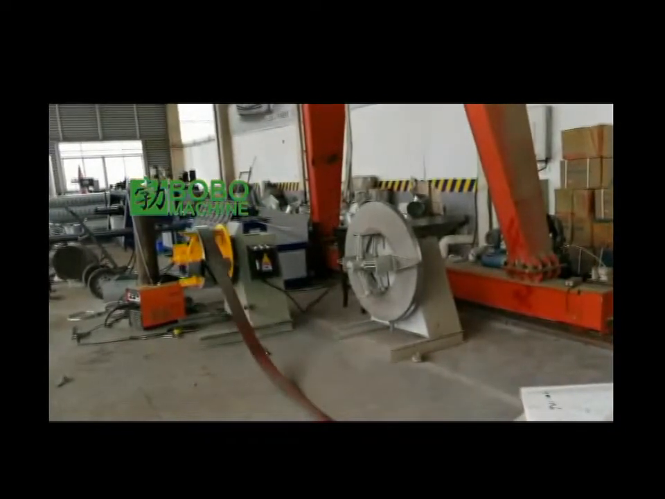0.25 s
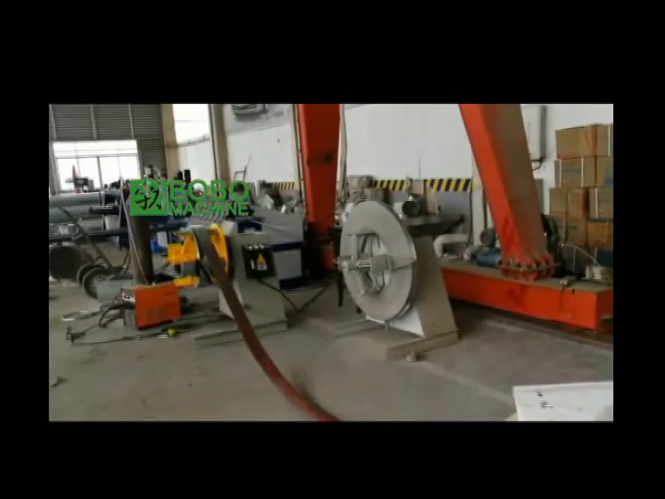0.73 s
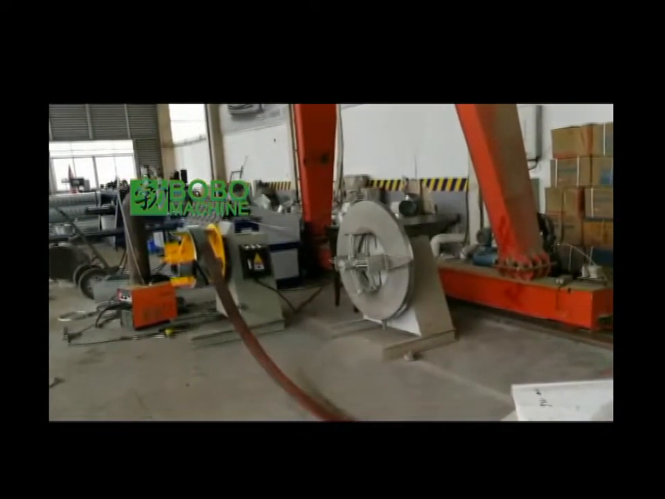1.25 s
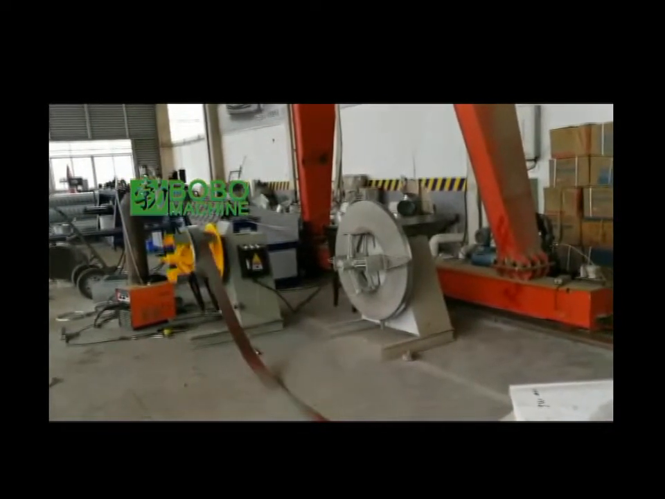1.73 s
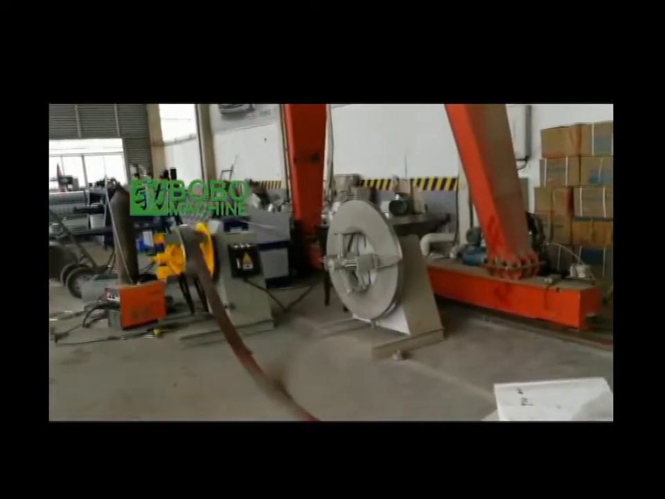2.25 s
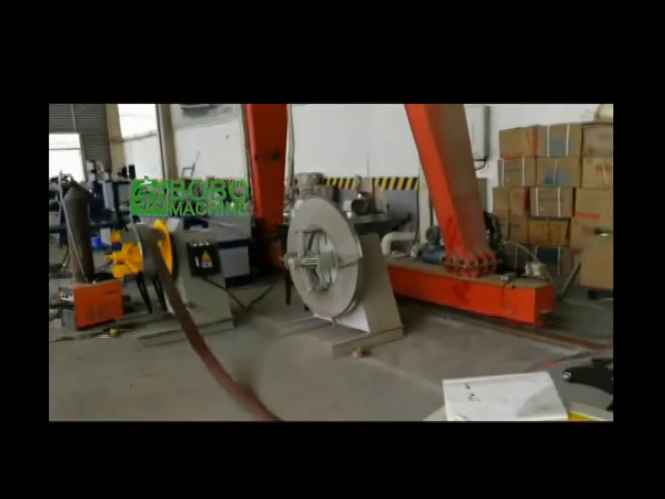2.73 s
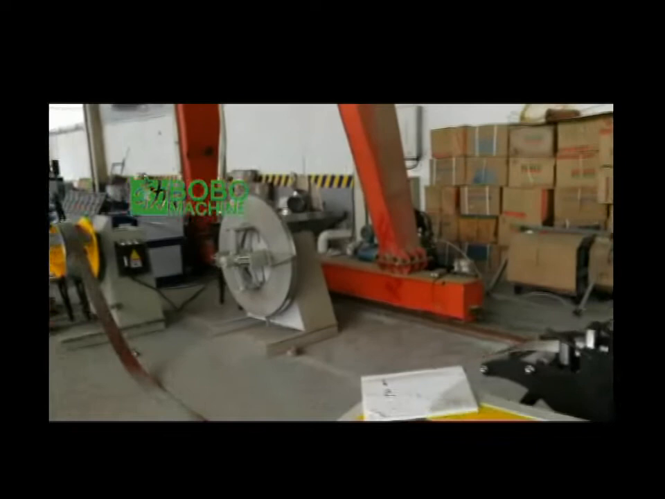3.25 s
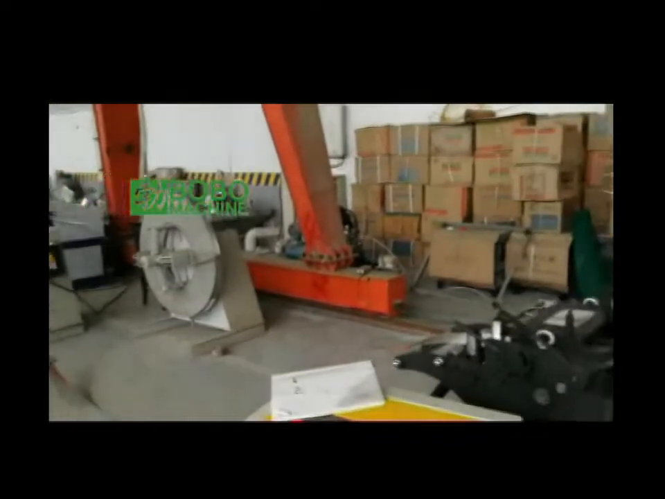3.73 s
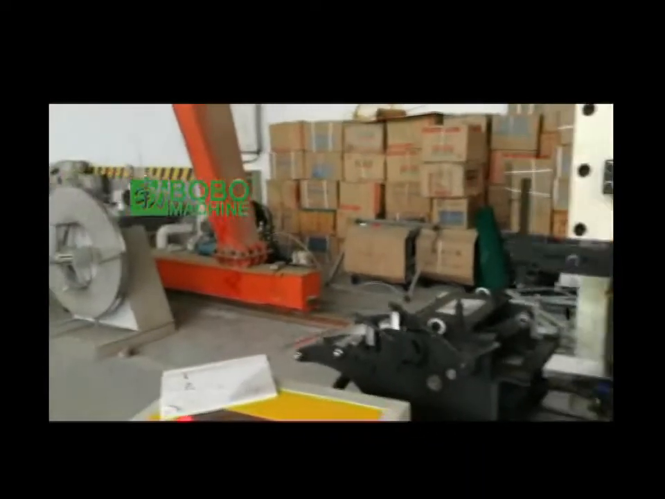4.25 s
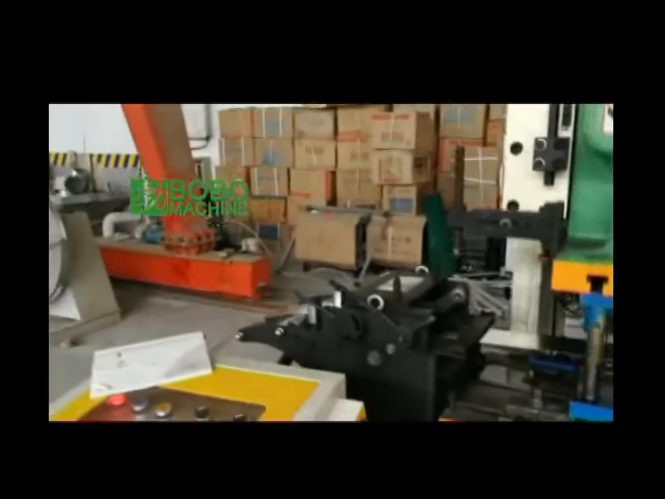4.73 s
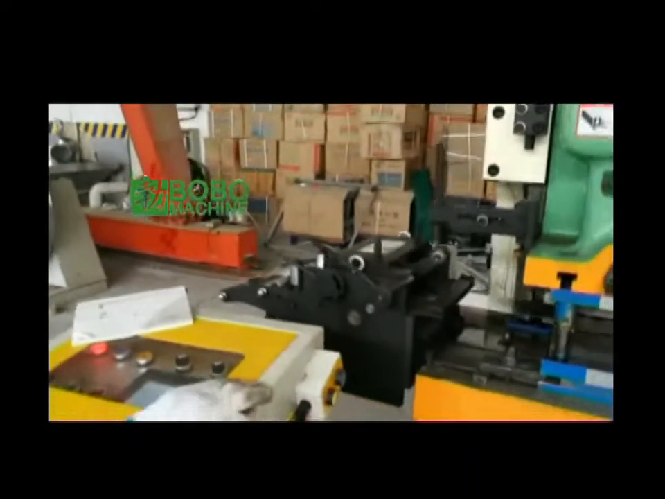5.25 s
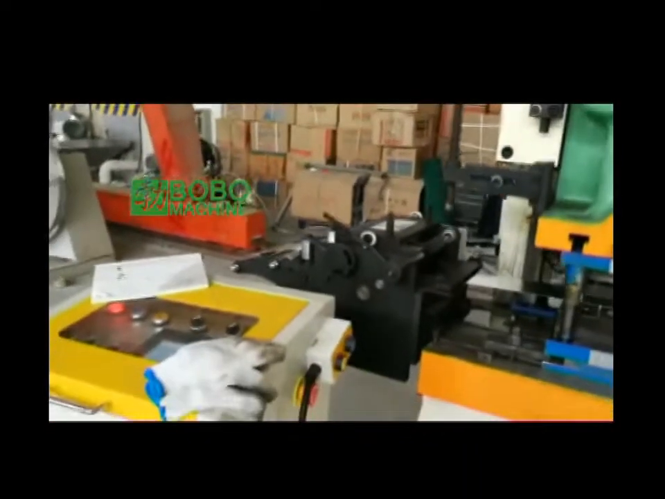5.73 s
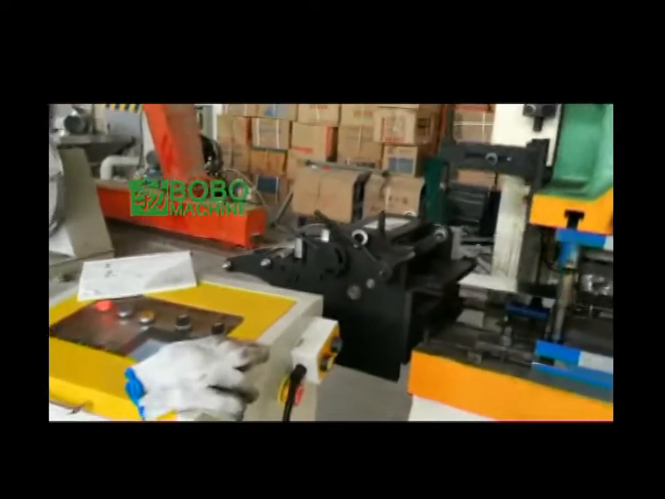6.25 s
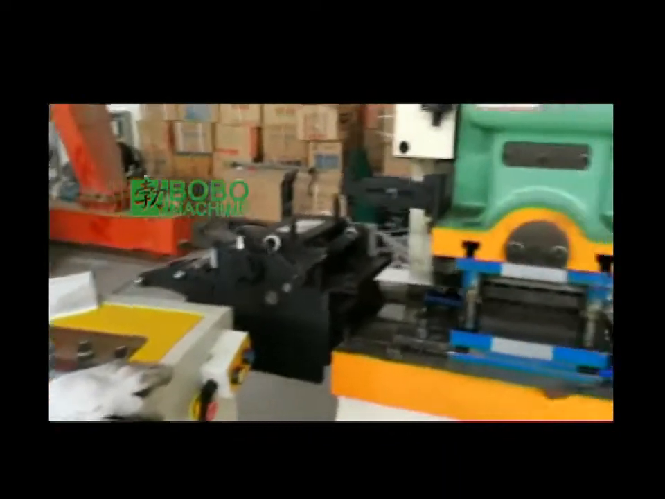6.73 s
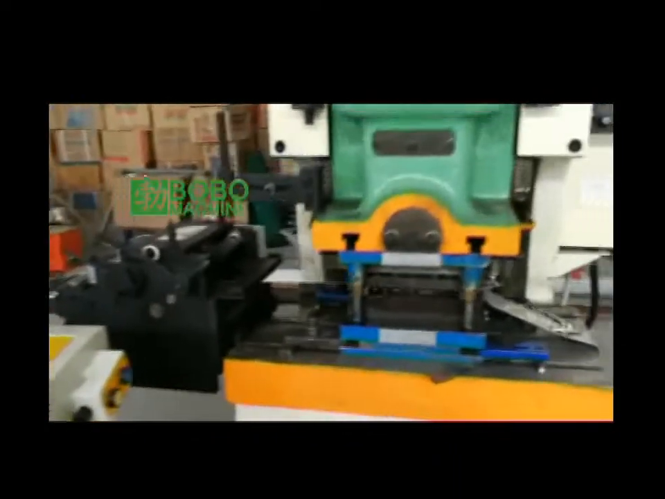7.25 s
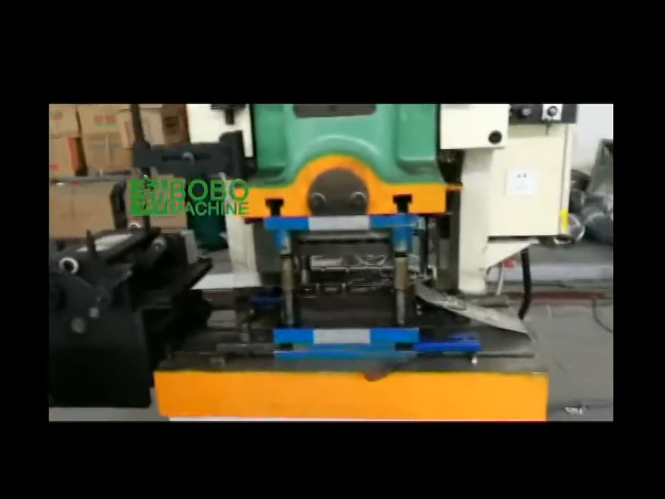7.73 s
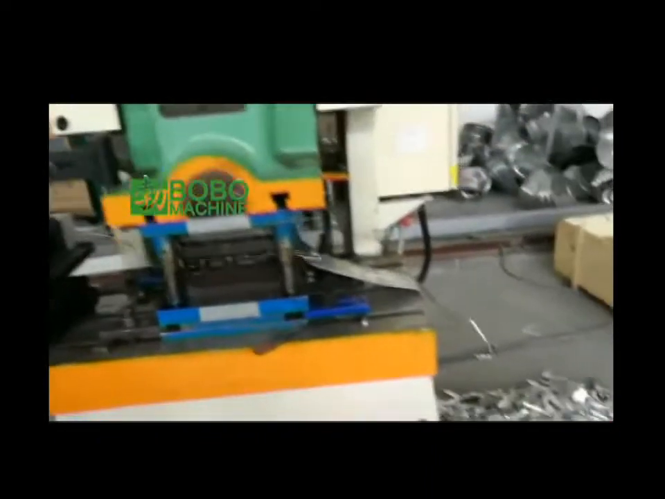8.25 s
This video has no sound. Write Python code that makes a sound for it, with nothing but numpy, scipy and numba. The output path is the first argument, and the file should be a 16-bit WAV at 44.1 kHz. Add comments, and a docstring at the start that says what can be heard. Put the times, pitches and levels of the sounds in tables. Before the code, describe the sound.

A punch press stamps steel about 83 times a minute, heavy thuds, clangs and strip rattle, stamped parts jingling in a hard workshop.

```python
"""Heavy blows thud and clang 83 times a minute: a punch press stamps steel strip in a hard-walled workshop.
Each turn of the crank: the feeder clacks, the punch thuds through the frame, the die clangs, the strip shakes
free and a stamped part drops jingling on the heap. Showers of clicks excite coloured noise bands and ringing modes;
motors and gears are shaped noise. A two-port microphone turns towards the press; its gain control ducks
under the blows, and the sound cuts out every 0.6 s."""
import sys
import numpy as np
from scipy import signal
from scipy.fft import rfft, irfft, next_fast_len
from scipy.io import wavfile
from scipy.ndimage import uniform_filter1d, map_coordinates
from numba import njit

SR = 44100
rng = np.random.default_rng(int(sys.argv[2]) if len(sys.argv) > 2 else 0)


def generate_wav(sig):
    """Save sig (samples, or channels by samples) to the path in sys.argv[1] as 16-bit PCM at SR."""
    pcm = np.round(np.clip(np.atleast_2d(sig).T, -1, 1) * 32767).astype(np.int16)
    wavfile.write(sys.argv[1], SR, pcm)


N = 373968

# Clear modes of a stamped part. Each row: pitch in Hz, level in dB, t60 in seconds.
PART_MODES = [(3354, -9, .4), (4765, -2, .45), (5588, 1, .5), (6234, -4, .3), (7172, 1, .5), (7500, -1, .3),
              (8180, 0, .5), (8721, 0, .5), (8985, -3, .4), (9755, -6, .35), (11710, -7, .2)]
# Dense, quickly damped resonances of a part. Each row: frequency in Hz, spectrum level in dB per Hz.
PART_COLOUR = [(500, -43), (2000, -9), (3500, 2.5), (5500, 6.5), (7600, 10), (8900, 11.5), (10000, 3.5),
               (11700, 6), (13000, -2), (16000, -7.5)]
# Dense resonances of the strip. Each row: frequency in Hz, spectrum level in dB per Hz.
STRIP_COLOUR = [(200, -4.5), (550, 10), (1050, 2), (1400, 9.5), (1950, 15.5), (2700, 5.5), (3500, 11.5),
                (5500, 10), (7500, 16), (9000, 11.5), (11000, 7.5), (16000, -4.5)]
FORCE_DB = -1  # force of the punch


def undb(db):
    """Decibels to gain."""
    return 10 ** (np.asarray(db) / 20)


def unit(x):
    """Scale to unit energy, averaged over the channels."""
    return x / np.sqrt(np.mean(np.sum(x ** 2, axis=-1)))


def gains(points, size):
    """A (Hz, dB) outline as gains on the bins of a transform."""
    hz, db = np.transpose(points)
    bins = np.log(np.fft.rfftfreq(size, 1 / SR) + 1)
    return undb(np.interp(bins, np.log(hz), db))


def colour(x, points):
    """Shape a sound by a spectrum, keeping the power of white noise."""
    size = next_fast_len(x.shape[-1] + 4096)
    g = gains(points, size)
    g = g / np.sqrt(np.mean(g ** 2))
    return irfft(rfft(x, size) * g, size)[..., :x.shape[-1]]


def fade(t, t60):
    """Exponential decay by 60 dB in t60 seconds."""
    return np.exp(-np.log(1000) * t / t60)


def ping(hz, t60):
    """One decaying mode."""
    t = np.arange(SR // 10) / SR
    return fade(t, t60) * np.sin(2 * np.pi * hz * t)


def add(track, s, sound):
    """Mix a sound into a track at a time in seconds."""
    i = int(s * SR)
    a, b = max(i, 0), min(i + len(sound), N)
    if b > a:
        track[a:b] += sound[a - i:b - i]


def wander(per_s):
    """Smooth random drift through a new level per_s times a second, of spread about 1.35."""
    step = int(SR / per_s)
    levels = np.repeat(rng.standard_normal(N // step + 1), step)
    return 1.65 * uniform_filter1d(levels, step)[:N]


def waver(x, depth_s=.00003, per_s=120):
    """Loose steel touches and lets go as it rings; a drifting delay roughens its high modes."""
    # depth_s is the delay per unit of drift
    return map_coordinates(x, [np.arange(N) + depth_s * SR * wander(per_s)], order=3)


def diffuse(size):
    """Noise from all round: long waves reach both ports alike, short ones unrelated."""
    mid, side = rfft(rng.standard_normal((2, size)))
    apart = np.clip(np.fft.rfftfreq(size, 1 / SR) / 620, 0, 1)
    ports = mid + np.array([[1], [-1]]) * apart * side
    return irfft(ports / np.sqrt(1 + apart ** 2), size)


def rattle(seconds, rate=2200, swell=0.38, scatter_db=4, size=12000):
    """Steel chattering on steel: a first contact, then a shower of uneven clicks that swells and dies."""
    # rate in clicks per second; swell in rattle times; the energy falls e-fold in one rattle time
    chance, lot, sign = rng.random((3, size))
    age = np.arange(size) / SR / max(seconds, 1e-4)
    strength = undb(-scatter_db * np.log(np.maximum(lot, .03)))
    clicks = (chance < rate / SR) * np.sign(sign - .5) * strength
    clicks = clicks * np.exp(-age / 2) * (1 - np.exp(-age / swell))
    clicks[0] = 1
    return unit(clicks)


def ring(modes, detune=0, mix_db=0, size=20000):
    """A body's free ringing: a sum of decaying modes at random weights, neighbours starting opposed."""
    hz, db, t60 = np.transpose(modes)[:, :, None]
    t = np.arange(size) / SR
    off, stronger = rng.standard_normal((2, *hz.shape))
    sign = (-1) ** np.arange(len(hz))[:, None]
    level = sign * undb(db + mix_db * stronger) / np.sqrt(t60)  # dB sets the energy, not the onset
    tones = np.sin(2 * np.pi * hz * (1 + detune * off) * t)
    return unit(np.sum(level * fade(t, t60) * tones, axis=0))


def body(clicks, points, modes, ring_db):
    """Clicks sound a body's dense resonances at once and leave its clear modes ringing."""
    ringing = signal.oaconvolve(clicks, ring(modes))[:N]
    return colour(clicks, points) + undb(ring_db) * waver(ringing)


def port_lag_ms(s):
    """The turning microphone: how late the left port hears the press at a time."""
    # Each row: time in seconds, lag of the left port in ms.
    bearing = [(0, 0.347), (3.2, 0.35), (4, 0.21), (6.2, 0.27), (7.1, 0.048), (8.5, -0.05)]
    return np.interp(s, *np.transpose(bearing))


def workshop(x, near_db, hall_db, size=48000):
    """Direct sound, scatter from floor and machines, then the long tail of the hall."""
    near_t60_s, hall_t60_s, treble_t60_s = 0.044, 0.98, 0.41
    t, now = np.arange(size) / SR, np.arange(N)
    lag = port_lag_ms(now / SR) * SR / 1000
    direct = np.array([map_coordinates(x, [now - lag], order=3), x])
    near = unit(diffuse(size) * fade(t, near_t60_s) * (t > .001))
    air = diffuse(size)
    low = signal.sosfilt(signal.butter(2, 4000, fs=SR, output="sos"), air)
    high = signal.sosfilt(signal.butter(2, 4000, "high", fs=SR, output="sos"), air)
    # the sign lets the two bands meet without a notch at the crossover
    tail = low * fade(t, hall_t60_s) - high * fade(t, treble_t60_s)
    tail = unit(tail * (1 - np.exp(-t / 0.0053)))
    room = undb(near_db) * near + undb(hall_db) * tail
    echoes = signal.oaconvolve(x[None], room, axes=1)[:, :N]
    return (direct + echoes) / np.sqrt(1 + undb(near_db) ** 2 + undb(hall_db) ** 2)


def strokes():
    """The moments at which the punch meets the strip: once on every turn of the flywheel."""
    first_s, turn_s, count = .0151, .72567, 12
    return first_s + turn_s * np.arange(count)


def crank(blows, level_db, slack_s, uneven_db, rate, swell):
    """The crank repeats the same blows on every turn, give or take the play in its joints."""
    track = np.zeros(N)
    for s in strokes():
        for after, seconds, db in blows:
            late, harder = rng.standard_normal(2)
            gain = undb(level_db + db + uneven_db * harder)
            add(track, s + after + slack_s * late, gain * rattle(seconds, rate, swell))
    return track


def shop(level_db=-36.5, flutter_db=2):
    """Motor, flywheel and gears rumble on between the blows as shaped noise, never quite even."""
    # Each row: frequency in Hz, spectrum level in dB per Hz.
    shop_colour = [(40, -6), (100, -5), (210, 3.5), (420, -1), (1100, -0.5), (2100, 1), (3500, -0.5),
                   (8000, -1), (11000, -4), (16000, -22)]
    rumble = colour(diffuse(next_fast_len(N))[:, :N], shop_colour)
    return undb(level_db + flutter_db * wander(50)) * rumble  # flutter in dB per unit of drift


def settle(per_s=14, clink_db=-9, uneven_db=3):
    """Loose parts on the shaking heap clink faintly at random."""
    chance, size = rng.random(N), rng.standard_normal(N)
    clinks = (chance < per_s / SR) * undb(clink_db + uneven_db * size)
    return body(clinks, PART_COLOUR, PART_MODES, ring_db=2)


def squeals(t60=0.09):
    """The sliding strip rubs on its guides: noise makes one mode or another sing out."""
    # Each row: start in seconds, length in seconds, pitch in Hz, level in dB.
    squeal_list = [(0.885, 0.046, 2210, -35), (1.574, 0.34, 1930, -37), (2.98, .13, 2190, -26),
                   (4.66, 0.028, 2166, -27), (5.23, 0.076, 2220, -29), (6.712, 0.19, 1090, -35),
                   (7.418, .18, 2230, -34)]
    track = np.zeros(N)
    for s, seconds, hz, db in squeal_list:
        size = int(seconds * SR)
        rub = rng.standard_normal(SR)[:size] * np.hanning(size) ** .5
        song = unit(signal.fftconvolve(rub, ping(hz, t60)))
        add(track, s, undb(db) * np.sqrt(size) * song)  # longer squeals carry more energy
    return workshop(track, near_db=2, hall_db=-8.5)


def bumps():
    """Dull low bumps that come with some landings, the same at both ports: clicks shaped to the bass."""
    # Each row: start in seconds, level in dB.
    bump_list = [(1.829, -7), (2.617, 2.5), (2.6245, 0), (5.42, -10), (7.64, -8), (8.336, -4)]
    # Each row: frequency in Hz, spectrum level in dB per Hz.
    bump_colour = [(70, 8), (200, 1), (500, -9), (2000, -58)]
    track = np.zeros(N)
    for s, db in bump_list:
        add(track, s, undb([db]))
    return colour(track, bump_colour)


def heap(gain_db=28, ring_db=-4, contact_db=16, detune=0.00206, count=2):
    """A stamped part ticks on the heap and bounces; each knock stirs the parts' modes in a new mixture."""
    # Parts landing after the strokes. Each row: start in seconds, level in dB, rattle time in seconds.
    landings = [(0.347, -4, 0.024), (1.066, -13, 0.0045), (1.8212, -8, 0.011), (2.6138, -9.5, 0.0043),
                (3.239, -10, 0.051), (3.971, -10.5, 0.014), (4.7315, -4, 0.019), (5.412, -6.5, 0.017),
                (6.1242, -5.5, 0.04), (6.925, -2, 0.025), (7.633, -5, 0.0034), (8.3105, -2, 0.0073)]
    # Further bounces and slips. Each row: start in seconds, level in dB, rattle time in seconds.
    bounces = [(.476, -17, 0.0061), (1.085, -8.5, 0.037), (4.028, -12, 0.012), (4.769, -8, 0.017),
               (4.899, -19.5, 0.0065), (6.299, -17, 0.0076), (7.098, -15, .0046), (8.326, -6, 0.029)]
    # The bright first touch. Each row: frequency in Hz, spectrum level in dB per Hz.
    contact_colour = [(1500, -35), (6500, 3), (16000, 0)]
    contacts, ticks, rings = np.zeros((3, N))
    for s, db, _ in landings:
        add(contacts, s, undb(db + contact_db) * rattle(0.0017, rate=5000, swell=.1))
    for s, db, seconds in landings + bounces:
        for _ in range(count):  # overlapping parts share the gain
            clicks = undb(db + gain_db) * rattle(seconds, rate=990, swell=0.068) / np.sqrt(2 * count)
            add(ticks, s, clicks)
            add(rings, s, signal.fftconvolve(clicks, ring(PART_MODES, detune, mix_db=4 * np.sqrt(2))))
    jingle = colour(ticks, PART_COLOUR) + undb(ring_db) * waver(rings, depth_s=.00002, per_s=150)
    touch = workshop(colour(contacts, contact_colour), near_db=-6, hall_db=7)
    return workshop(jingle + settle(), near_db=11.5, hall_db=0.5) + touch


def feeder():
    """Feed rollers clack and pull the strip; steel clanks as the feed hits its stop and the punch bites."""
    # Roller clacks. Each row: seconds after the stroke, rattle time in seconds, level in dB.
    feed_blows = [(-.073, 0.0088, 10.3), (-.056, 0.0094, 10), (-.046, 0.011, 18.1), (-.006, 0.019, 13)]
    # Stop and bite. Each row: seconds after the stroke, rattle time in seconds, level in dB.
    clank_blows = [(-.0405, 0.0014, 6.8), (.001, 0.019, 14.4)]
    # Ringing of the feeder. Each row: pitch in Hz, level in dB, t60 in seconds.
    feed_modes = [(689.3, 3.5, 0.39), (1880, 1.5, 0.056), (7450, -8, 0.074)]
    # Dense resonances of the feeder. Each row: frequency in Hz, spectrum level in dB per Hz.
    feed_colour = [(200, -37), (1100, -2), (1900, 9), (3200, 4), (5000, 7), (7000, 10), (8700, 10.5),
                   (10000, 0), (12500, 0), (16000, -11)]
    # Tone of the clanks. Each row: frequency in Hz, spectrum level in dB per Hz.
    clank_colour = [(500, -10), (1050, -1), (2050, 2), (5000, -19)]
    blows = crank(feed_blows, FORCE_DB, slack_s=.002, uneven_db=1.5, rate=2000, swell=.4)
    clanks = crank(clank_blows, FORCE_DB, slack_s=.001, uneven_db=1, rate=1500, swell=.3)
    clack = body(blows, feed_colour, feed_modes, ring_db=-14.5)
    clank = colour(clanks, clank_colour)
    return workshop(clack, near_db=5.5, hall_db=-4.0) + workshop(clank, near_db=-1.5, hall_db=-2)


def snaps(cycles=26, ring_db=16):
    """Hard break-throughs: a short yelp of steel at its own pitch, and a bright click along the strip."""
    # Each row: start in seconds, level in dB, pitch in Hz, bright click above that level in dB.
    snap_list = [(.1145, -1.5, 2750, 22), (.8066, -5.5, 2049, 13), (1.563, 1.5, 1965, 12),
                 (2.312, -10, 2947, 17), (5.9164, -2, 2155, 19), (7.3552, -4, 2280, 5.5)]
    yelps, clicks = np.zeros((2, N))
    t = np.arange(SR // 20) / SR
    for s, db, hz, bright_db in snap_list:
        snap = rattle(0.0015)
        tone = fade(t, cycles / hz) * np.sin(2 * np.pi * hz * t)
        add(yelps, s, undb(db + ring_db) * unit(signal.fftconvolve(snap, tone)))
        add(clicks, s, undb(db + bright_db) * snap)
    return workshop(yelps + colour(clicks, STRIP_COLOUR), near_db=0.5, hall_db=-7.5)


def die_and_strip(shiver_db=-2, guard_db=-12):
    """The die set clangs shut; the strip shivers as it is pulled off the punch and sets the guards ringing."""
    # Die clangs. Each row: seconds after the stroke, rattle time in seconds, level in dB.
    die_blows = [(-.045, 0.01, 2.8), (-.012, 0.038, 7.8), (.018, 0.022, 7.3), (.043, 0.016, 11.3),
                 (.081, 0.0049, 10.1), (.115, 0.041, 7.4), (.22, 0.059, 3.6)]
    # Strip shivers. Each row: seconds after the stroke, rattle time in seconds, level in dB.
    strip_blows = [(.085, 0.0077, 8.4), (.108, 0.016, 18.8), (.152, 0.033, 23.3), (.2, 0.033, 2.9)]
    # Ringing of the die set. Each row: pitch in Hz, level in dB, t60 in seconds.
    die_modes = [(544, -4, .15), (692, 0, .15), (1013, -1, .35), (1068, -1, .4), (1200, -3, .3)]
    # Sheet-metal guards shaken by the strip. Each row: pitch in Hz, level in dB, t60 in seconds.
    guard_modes = [(1075, 0, .25), (1690, -2, .15), (1785, -1, .12), (1890, 0, .15), (2114, -3, .14),
                   (2226, 0, .25)]
    # Dense resonances of the die set. Each row: frequency in Hz, spectrum level in dB per Hz.
    die_colour = [(100, -13), (350, 0), (400, -6.5), (570, 3), (800, -2.5), (1020, 3.5), (1400, -1),
                  (2000, -2), (3000, -4.5), (5000, -15), (15000, -68)]
    die = crank(die_blows, FORCE_DB, slack_s=.003, uneven_db=1.5, rate=400, swell=.4)
    strip = crank(strip_blows, shiver_db, slack_s=.005, uneven_db=1.5, rate=900, swell=.7)
    guards = undb(guard_db) * signal.oaconvolve(strip, ring(guard_modes))[:N]
    clang = body(die, die_colour, die_modes, ring_db=-11.0)
    shiver = body(strip, STRIP_COLOUR, PART_MODES, ring_db=-14.5)
    return workshop(clang + shiver, near_db=1.5, hall_db=-3.5) + workshop(guards, near_db=-9, hall_db=-2.0)


def frame(knock_hz=230, knock_s=0.0021, knock_db=-9, facing_db=4.5, shade_db_per_ms=8):
    """The cast frame springs back in a short knock as the punch breaks through, then shudders."""
    # Shudders. Each row: seconds after the stroke, rattle time in seconds, level in dB.
    frame_blows = [(-.012, 0.0043, 1.5), (.001, 0.00045, 10.5), (.022, 0.0057, 10.5), (.05, 0.0034, 3.5),
                   (.08, 0.0098, -1), (.115, 0.0061, 2), (.21, 0.022, 0), (.28, 0.01, -13)]
    # Ringing of the frame. Each row: pitch in Hz, level in dB, t60 in seconds.
    frame_modes = [(101.7, -9.5, 0.27), (122.7, -4, 0.34), (180.9, -3.5, 0.2), (207.6, 1, 0.22),
                   (326, -11, 0.11)]
    # Dense resonances of the frame. Each row: frequency in Hz, spectrum level in dB per Hz.
    frame_colour = [(45, -36), (75, -8), (140, -9.5), (210, -4), (320, 2), (400, -9.5), (560, -4),
                    (900, -8), (2500, -42)]
    t = np.arange(SR // 10) / SR
    swell = 2 * (t / knock_s) ** 2 * np.exp(-t / knock_s)  # peaks near 1
    spring = undb(knock_db + FORCE_DB) * swell * np.sin(2 * np.pi * knock_hz * t)
    knock = np.zeros(N)
    for s in strokes():
        add(knock, s - knock_s, spring)
    blows = crank(frame_blows, FORCE_DB, slack_s=0.00045, uneven_db=1.0, rate=350, swell=1.16)
    shudder = body(blows, frame_colour, frame_modes, ring_db=-2)
    thud = knock + workshop(shudder, near_db=-5.0, hall_db=-8.5)
    # the thud is weaker the further the microphone is turned away
    return thud * undb(facing_db - shade_db_per_ms * port_lag_ms(np.arange(N) / SR))


def scene():
    """The whole press in its workshop, louder at the right port, which faces the machine."""
    # Each row: frequency in Hz, left minus right in dB.
    port_balance = [(200, 0), (380, -1.5), (700, -2), (1300, -4.5), (2400, -7), (4400, -4.5), (8000, -5.5),
                    (15000, 0)]
    sound = shop() + squeals() + bumps() + heap() + feeder() + snaps() + die_and_strip() + frame()
    size = next_fast_len(N)
    tilt = np.sqrt(gains(port_balance, size))  # half of the difference on each port
    return irfft(rfft(sound, size) * np.array([tilt, 1 / tilt]), size)[:, :N]


def gaps(drop_db=-18, close_s=0.0053, open_s=0.0017):
    """The sound cuts out at a steady beat: it drops at once, sinks away and returns on a short ramp."""
    # Beats whose gap is short, counted from 0.
    short_beats = (1, 6, 7, 10, 12, 13)
    first_s, every_s, count = .5395, .6, 14
    long_s, short_s = 0.042, 0.015
    growth = 0.0012  # the gaps lengthen slowly, s per s
    t, gain = np.arange(N) / SR, np.ones(N)
    for k in range(count):
        age = t - first_s - k * every_s
        length = (short_s if k in short_beats else long_s) + growth * k * every_s
        closing = np.where(age < 0, 1, undb(drop_db) * np.exp(-np.abs(age) / close_s))
        opening = .5 + .5 * np.tanh((age - length) / (2 * open_s))
        gain = gain * np.maximum(closing, opening)
    return uniform_filter1d(gain, size=40)


@njit
def follow(x, attack, release):
    """An envelope that rises fast and falls slowly."""
    out, e = np.empty(len(x)), 0.
    for i in range(len(x)):
        e += (x[i] - e) * (attack if x[i] > e else release)
        out[i] = e
    return out


def record(dry, drive_db=2, knee_db=-13, ratio=2.44, attack_s=0.00058, release_s=0.091,
           bass_cut_hz=45, top_hz=16000):
    """The microphone thins deep bass, gain control ducks under blows, gaps cut in, peaks round off, top is cut."""
    heard = signal.sosfilt(signal.butter(2, bass_cut_hz, "high", fs=SR, output="sos"), dry)
    louder_port = undb(drive_db) * np.abs(heard).max(axis=0)
    envelope = follow(louder_port, 1 / (attack_s * SR), 1 / (release_s * SR))
    gain = undb(drive_db) * np.maximum(envelope / undb(knee_db), 1) ** (1 / ratio - 1)
    rounded = np.tanh(heard * gain * gaps())
    return signal.sosfilt(signal.ellip(10, .2, 80, top_hz, fs=SR, output="sos"), rounded)


dry = scene()
out = record(dry)
generate_wav(out)
```